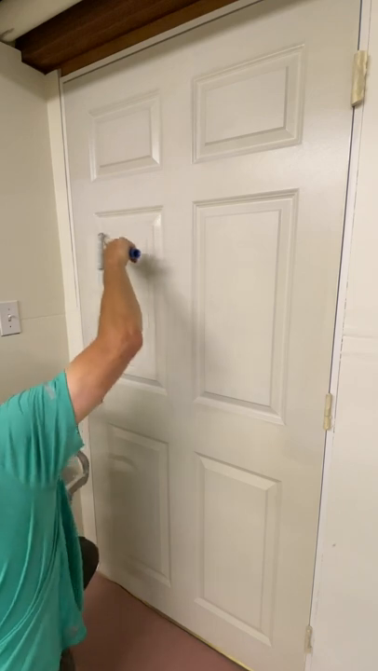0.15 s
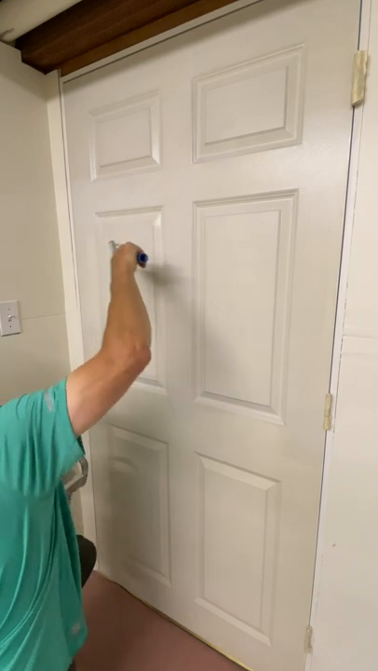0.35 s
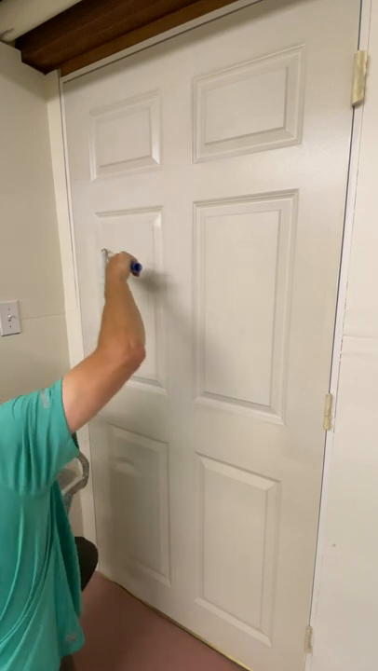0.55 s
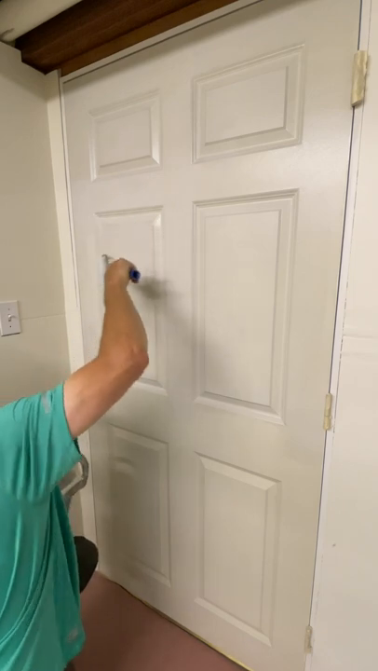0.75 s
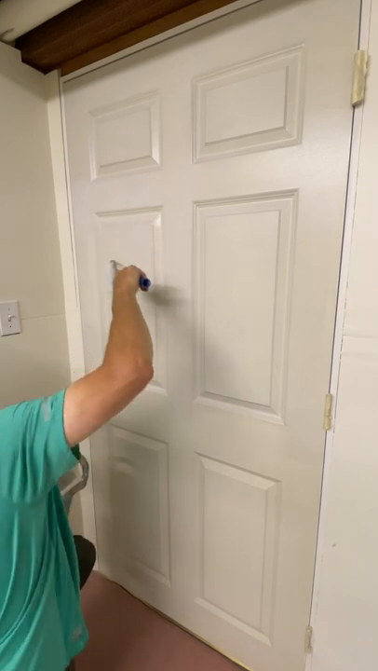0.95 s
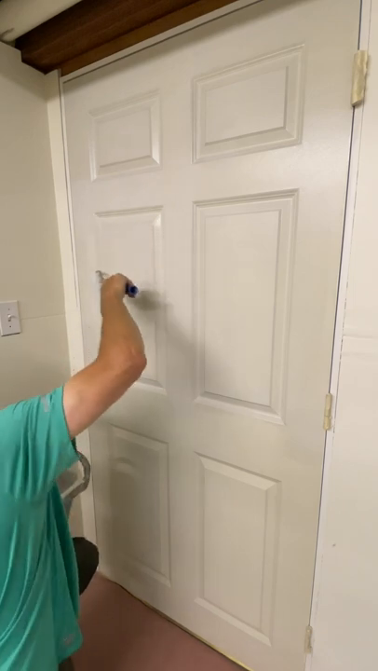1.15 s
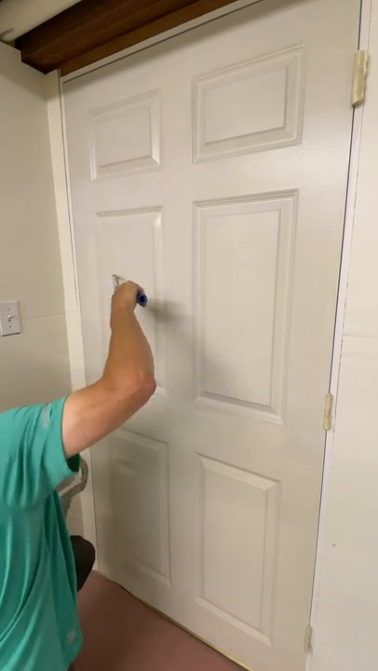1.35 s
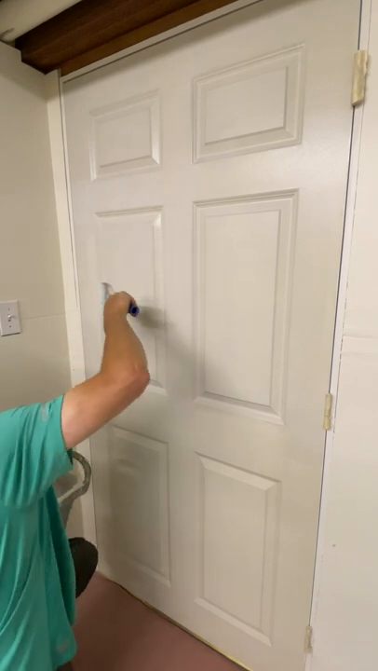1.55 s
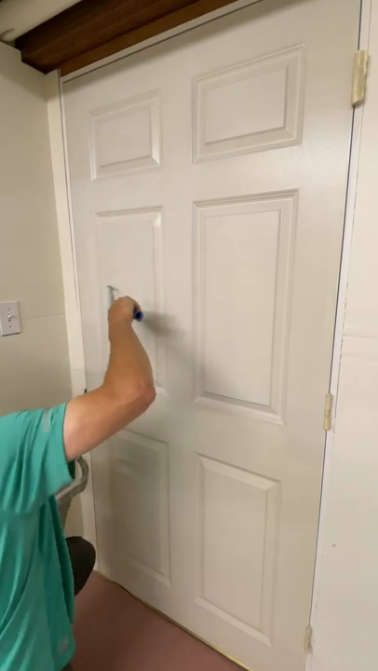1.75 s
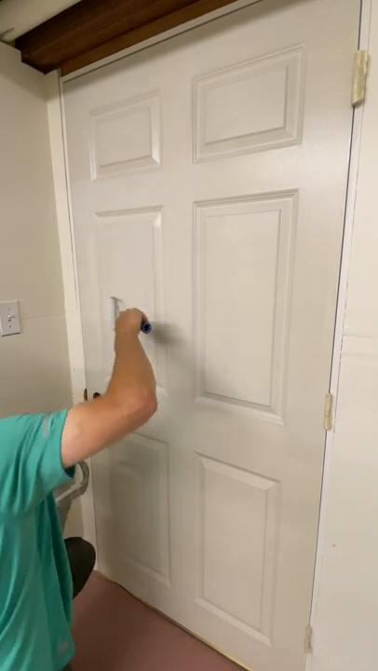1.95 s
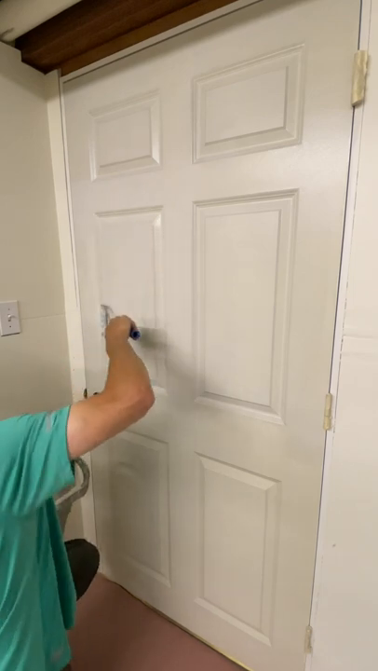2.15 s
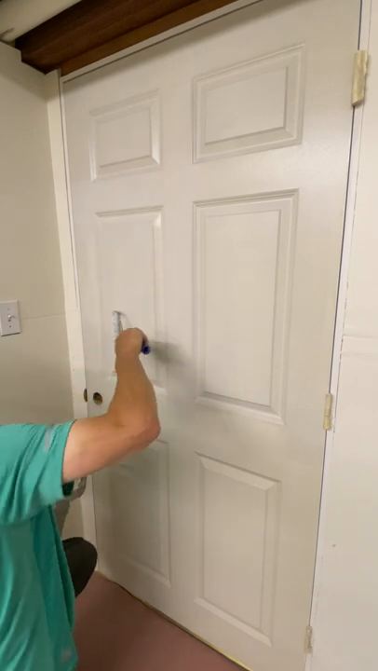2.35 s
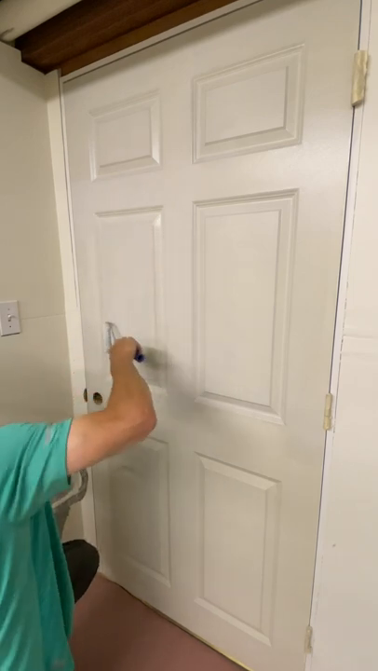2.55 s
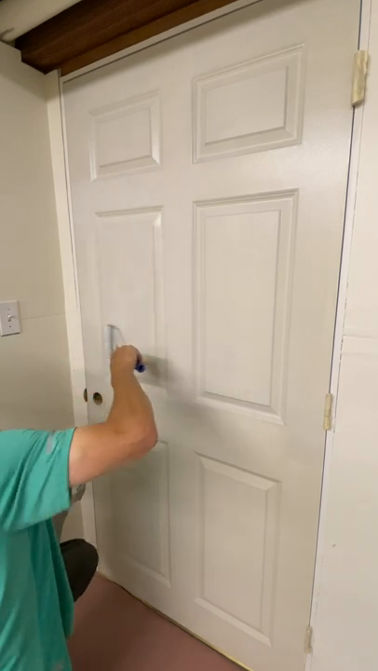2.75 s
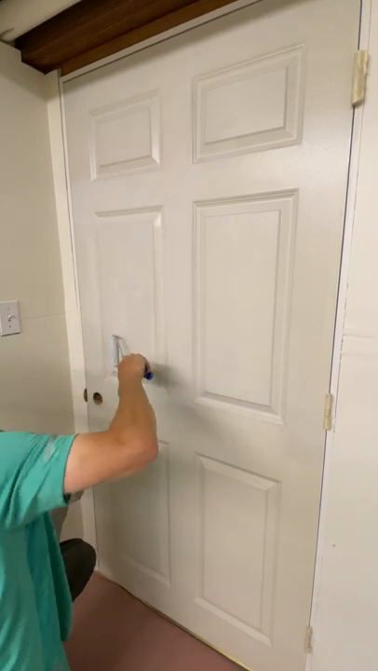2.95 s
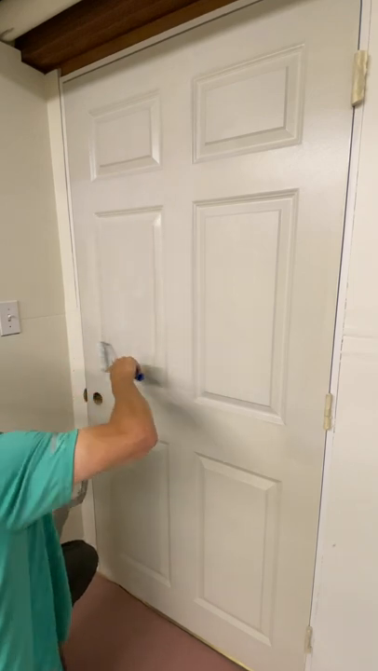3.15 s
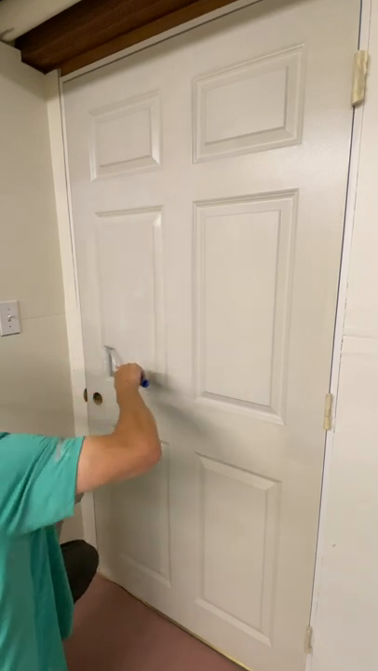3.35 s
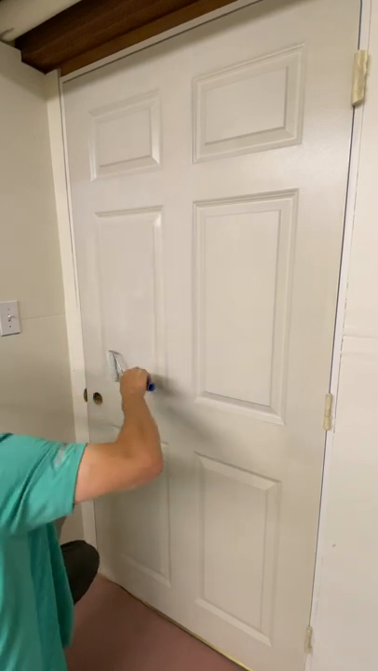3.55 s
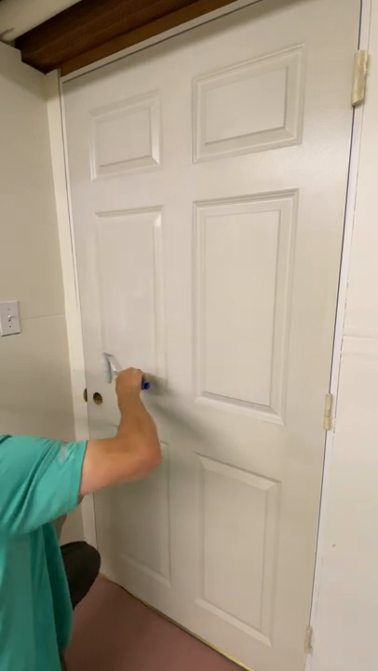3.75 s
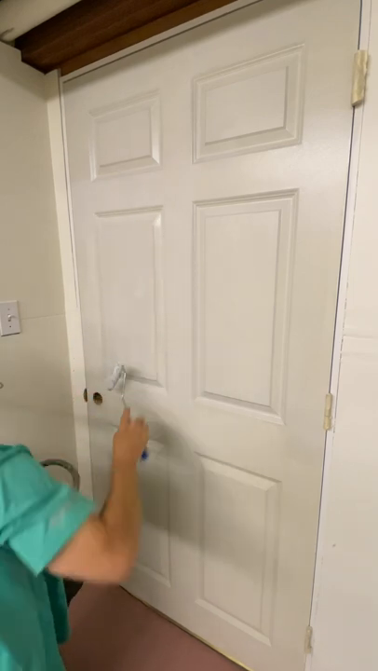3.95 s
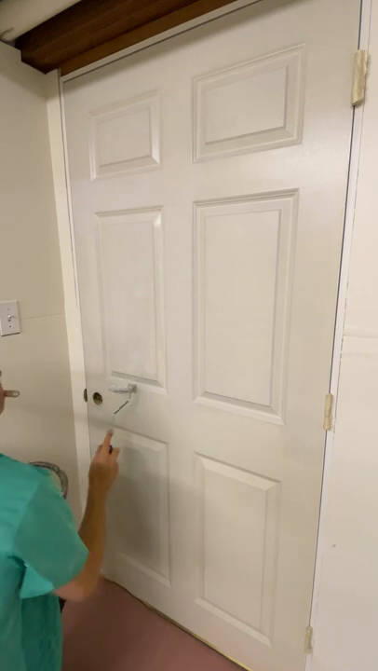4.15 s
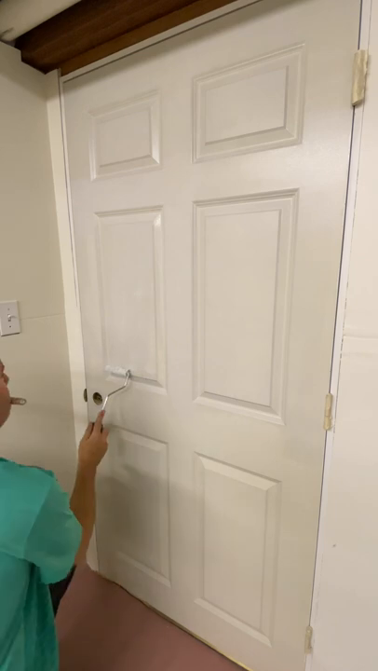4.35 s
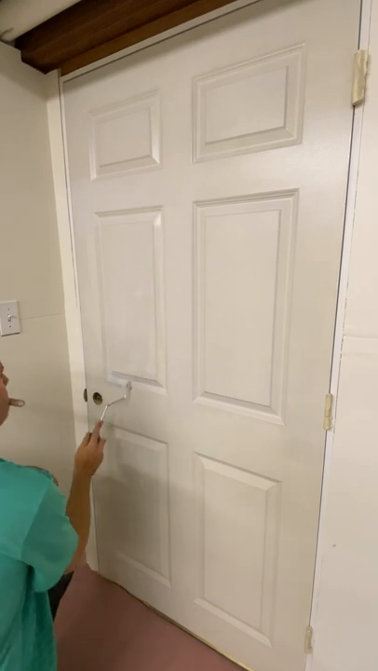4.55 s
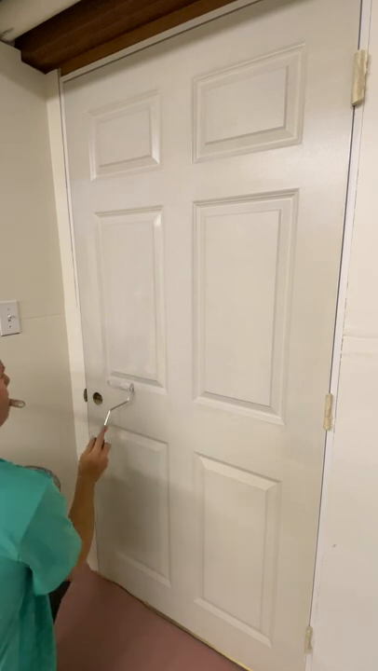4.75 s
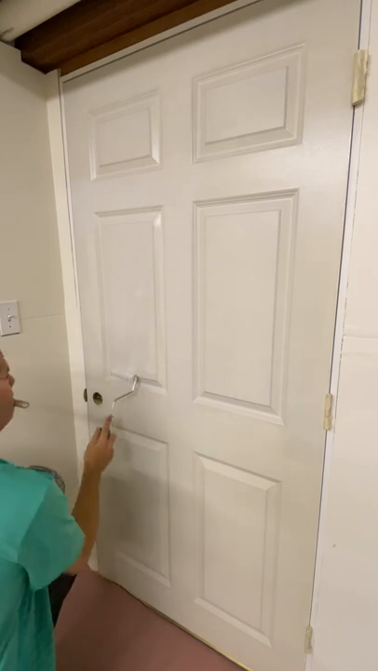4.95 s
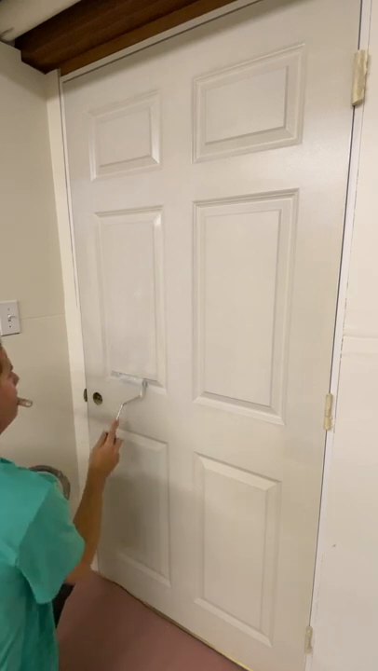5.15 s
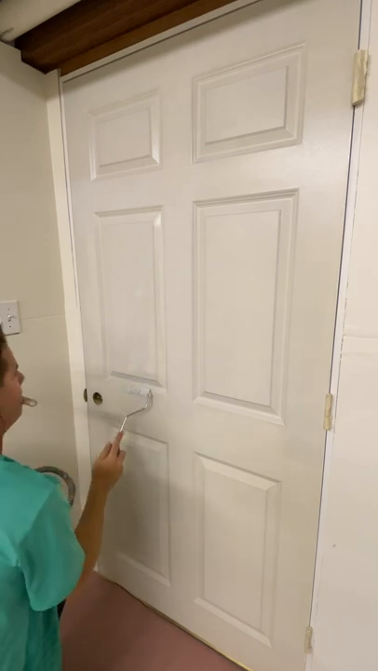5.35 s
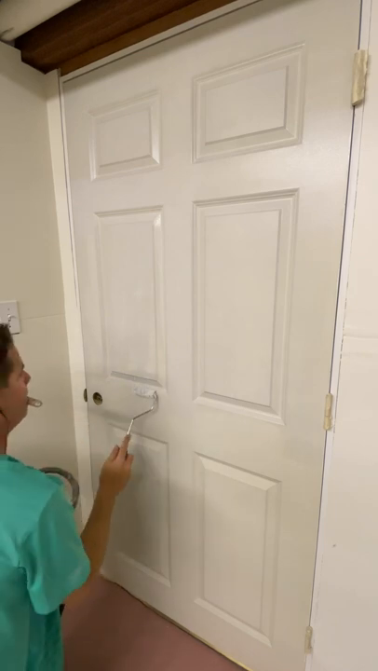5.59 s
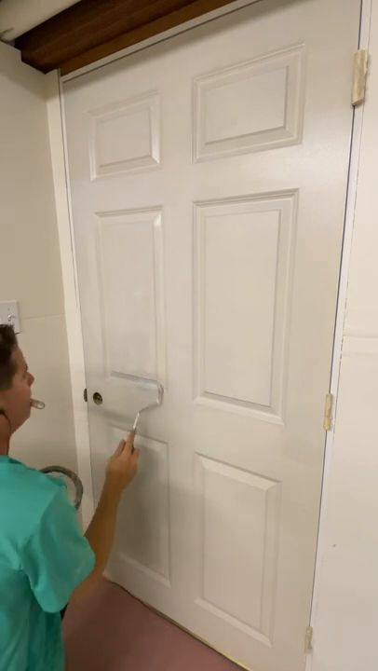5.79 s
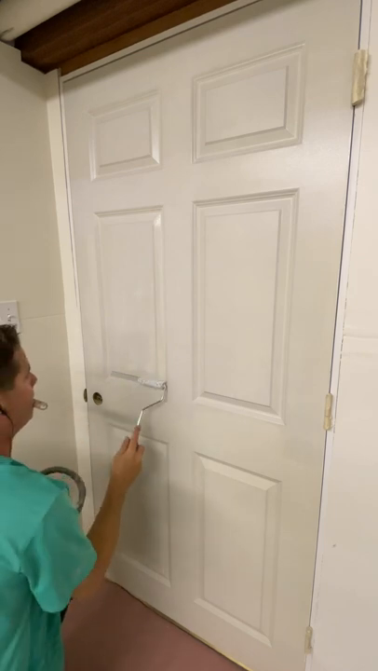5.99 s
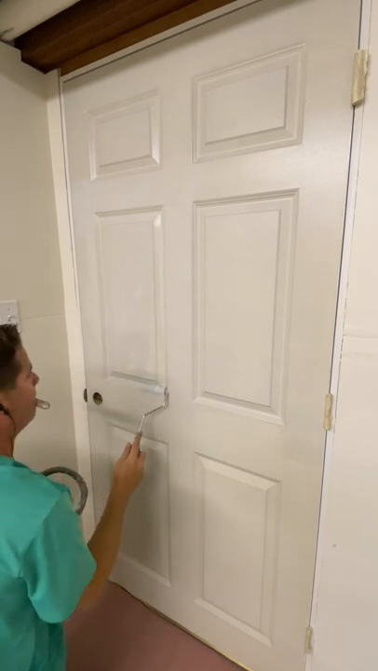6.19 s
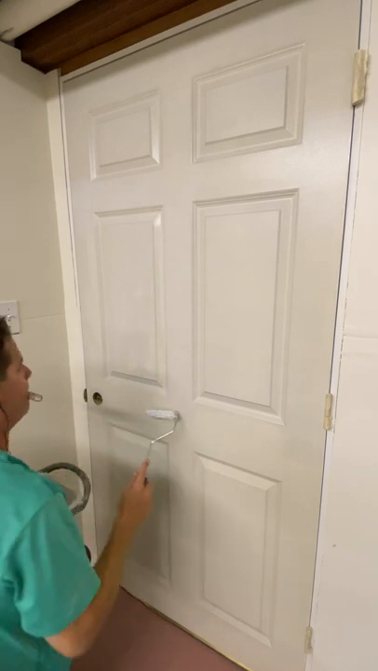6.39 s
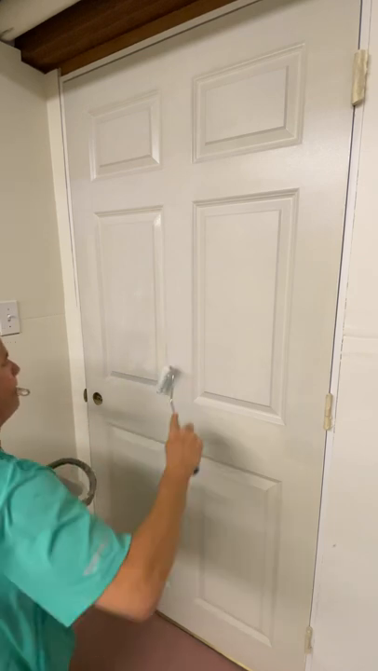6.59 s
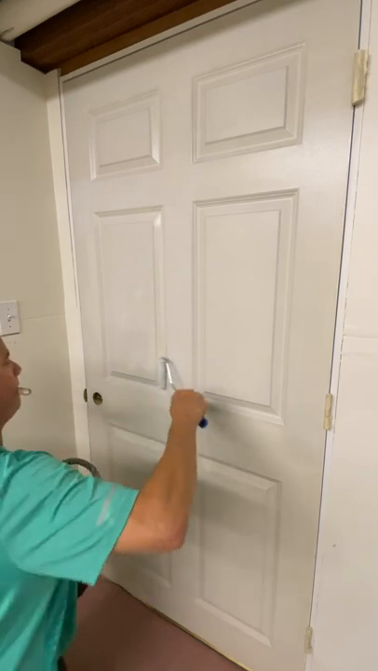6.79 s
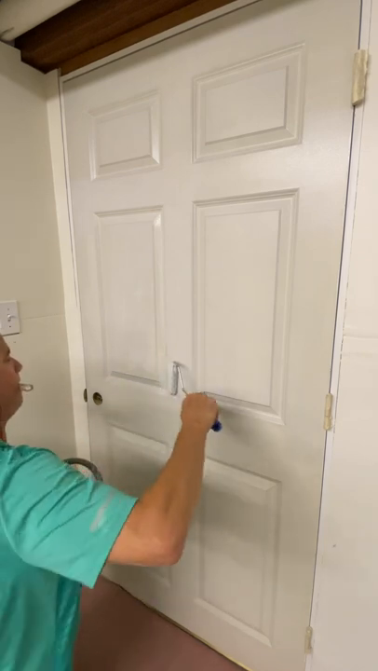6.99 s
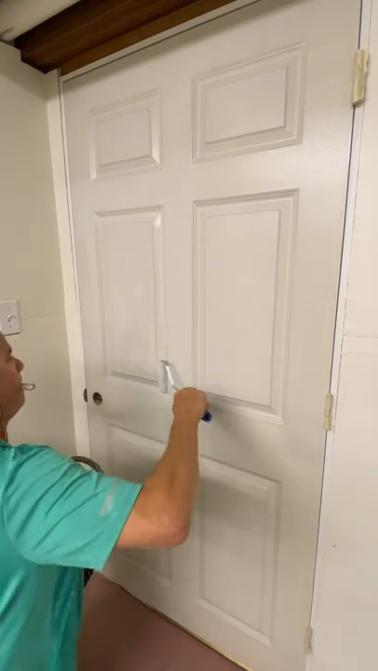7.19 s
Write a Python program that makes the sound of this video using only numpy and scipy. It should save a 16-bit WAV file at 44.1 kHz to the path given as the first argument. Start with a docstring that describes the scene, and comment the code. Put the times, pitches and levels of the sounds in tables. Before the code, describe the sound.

A small wet paint roller rubs quickly over a hollow panel door, fizzing stickily, with low rumbles, wooden knocks and small wire pings.

```python
"""A small foam roller runs in quick strokes over a wet, hollow panel door in a small room, heard in stereo.
From the first moment wet paint fizzes off the nap, the door rumbles under the pressure, the roller knocks
over the mouldings and its wire frame pings. From two seconds in, a leaf mode hums under some pushes.
Past four seconds the plastic end of the sleeve clacks on the door and bounces; past six, three hollow raps
come from a panel corner. Noise bands make fizz, rumble and knocks; decaying sines make what rings."""
import sys
import numpy as np
from scipy import signal
from scipy.fft import rfft, irfft, next_fast_len
from scipy.io import wavfile
from scipy.ndimage import uniform_filter1d, map_coordinates

SR = 44100
rng = np.random.default_rng(int(sys.argv[2]) if len(sys.argv) > 2 else 0)


def to_wav(sig):
    """Store sig (one row per channel, or 1-D mono) as 16-bit WAV at the path in sys.argv[1].

    Samples outside -1..1 are clipped; the rate is SR.
    """
    pcm = np.clip(np.atleast_2d(sig), -1, 1) * 32767
    pcm = np.round(pcm).astype(np.int16)
    wavfile.write(sys.argv[1], SR, pcm.T)  # frames by channels


N = 318843

# Modes of the whole door leaf. Each row: frequency in Hz, relative level in dB, t60 in seconds.
LEAF_MODES = [(114.3, -0.5, 0.34), (147.2, -6, 0.35), (160.45, 0, 0.25), (212.3, -4.5, 0.22),
              (243.6, -8, 0.14)]
# Modes of the door's thin skin. Each row: frequency in Hz, relative level in dB, t60 in seconds.
SKIN_MODES = [(283.5, -5, 0.18), (342, -6, 0.2), (374, 0.5, 0.2), (455.5, 1, 0.13), (479.6, 3.5, 0.073),
              (521, 3, 0.079), (610.3, -9.5, 0.12), (773, -10.5, 0.078), (902, -20, 0.094),
              (1030, -8, 0.11), (1130, -24, .07), (1370, -14, .06)]


def amp(db):
    """Decibels to gain."""
    return 10 ** (np.asarray(db) / 20)


def unit(x):
    """x scaled to an rms of 1."""
    return x / np.sqrt(np.mean(x ** 2) + 1e-20)


def along(points, hz):
    """Reads a curve of (Hz, value) points on a log frequency axis."""
    f, v = np.transpose(points)
    return np.interp(np.log(hz + 1), np.log(f + 1), v)


def wobble(rate):
    """A smooth random curve through rate knots a second."""
    knots = rng.standard_normal(int(N * rate / SR) + 4)
    return map_coordinates(knots, [np.arange(N) * rate / SR])


def filtered(x, response):
    """x times a complex response of frequency."""
    m = next_fast_len(N + SR // 2)
    return irfft(rfft(x, m) * response(np.fft.rfftfreq(m, 1 / SR)), m)[..., :N]


def coloured(x, curve):
    """x with its spectrum shaped by a curve of (Hz, dB) points."""
    return filtered(x, lambda hz: amp(along(curve, hz)))


def noise(spectrum, spiky_db=0):
    """Coloured noise of rms 1; spiky_db spreads the sizes of its grains."""
    grains = rng.standard_normal(N) * amp(spiky_db * rng.exponential(size=N))
    return unit(coloured(grains, spectrum))


def patchy(spectrum, spiky_db, patchy_db):
    """Grainy noise whose colour drifts at random over time and frequency."""
    z = signal.stft(noise(spectrum, spiky_db), nperseg=256)[2]
    field = uniform_filter1d(rng.standard_normal(z.shape), size=4, axis=0)
    field = uniform_filter1d(field, size=8, axis=1)
    return unit(signal.istft(z * amp(patchy_db * unit(field)), nperseg=256)[1][:N])


def sparse(rate, spread_db):
    """Clicks at random moments, rate a second on average, of random size and sign."""
    when, size, sign = rng.random((3, N))
    return (when < rate / SR) * amp(-spread_db * np.log(size + 0.0035)) * np.sign(sign - .5)


def bursts(times, levels_db, t60, rise):
    """An envelope that rises quickly at each time and dies away; overlaps add in power."""
    env, t = np.zeros(N + SR), np.arange(SR // 2) / SR
    for s, db in zip(times, levels_db):
        env[round(s * SR):][:len(t)] += amp(2 * (db - 60 * t / t60)) * (1 - np.exp(-t / rise)) ** 2
    return np.sqrt(env[:N])


def spells(start, length, level_db, fall_db, rise, t60):
    """An envelope that rises at each start, sinks steadily for its length and then dies away."""
    env, t = np.zeros(N + SR), np.arange(SR * 3 // 4) / SR
    holds, rises = np.maximum(length, .01), rise + 0 * start
    for s, hold, db, fall, swell in zip(start, holds, level_db, fall_db, rises):
        shape_db = db - fall * np.minimum(t / hold, 1) - 60 * np.maximum(t - hold, 0) / t60
        env[round(s * SR):][:len(t)] += amp(2 * shape_db) * (1 - np.exp(-t / swell)) ** 2
    return np.sqrt(env[:N])


def ringing(times, levels_db, modes, scatter_db, rise=0.00084):
    """Every blow rings the same decaying modes at new random strengths and signs."""
    out, t = np.zeros(N + SR), np.arange(SR // 2) / SR
    hz, mode_db, t60 = np.transpose(modes)[:, :, None]
    shapes = amp(mode_db - 60 * t / t60) * np.sin(2 * np.pi * hz * t) * (1 - np.exp(-t / rise))
    chance = rng.standard_normal((len(times), 2, len(modes)))
    for s, db, (size, sign) in zip(times, levels_db, chance):
        out[round(s * SR):][:len(t)] += (amp(db + scatter_db * size) * np.sign(sign)) @ shapes
    return out[:N]


def still_air():
    """The still room: steady noise, partly common to both ports and partly separate in each."""
    # Each row: frequency in Hz, relative level in dB per Hz.
    air = [(15, -48.5), (25, 2), (79, 3), (130, -10), (363, -33), (515, -35), (691, -36), (927, -32),
           (2000, -31), (15000, -48.5)]
    common, separate = noise(air), np.array([noise(air), noise(air)])
    return amp(-60.5) * (0.28 * common + 0.5 * separate)


def room(x):
    """The walls answer with noise tails whose frequencies die at their own speeds and differ by port."""
    # Each row: frequency in Hz, t60 in seconds.
    wall_decay = [(100, 0.8), (500, 0.14), (2000, 0.19), (8000, 0.025)]
    # Room against direct sound. Each row: frequency in Hz, gain in dB.
    wet_curve = [(40, -39), (120, -25), (300, -12.5), (600, 0), (1800, -7.5), (3000, -8), (6000, -9.5),
                 (15000, -79)]
    step, out = SR // 3, np.zeros((2, N + 2 * SR))
    for start in range(0, N, step):  # a fresh tail for each third of a second
        hz, t, z = signal.stft(rng.standard_normal((2, SR // 2)), SR, nperseg=256)
        fall = amp(-60 * t / along(wall_decay, hz)[:, None])
        fall = fall / np.linalg.norm(fall, axis=1, keepdims=True)
        tail = signal.istft(z * fall, SR, nperseg=256)[1]
        tail = tail / np.linalg.norm(tail[0])
        answer = signal.fftconvolve(x[None, start:start + step], tail, axes=1)
        out[:, start + SR // 150:][:, :answer.shape[1]] += answer
    return coloured(out[:, :N], wet_curve)


def frame():
    """A jolt rings the loose wire frame; the axle squeaks roughly on its lowest mode, then lets go."""
    # Each row: start in seconds, nominal level in dB, pitch in Hz, squeak length in seconds.
    jolts = [(0.364, -49, 1070, .006), (0.519, -45, 1035, 0.018), (0.854, -62, 1030, .006),
             (0.946, -46, 1065, .008), (1.075, -58, 1025, .02), (1.21, -47, 1007, 0.0098),
             (1.314, -49, 1010, .008), (1.5516, -59, 1080, .006), (1.905, -45, 1050, 0.0086),
             (2.1131, -49, 975, .008), (2.2467, -49, 1000, 0.0095), (2.397, -47.5, 1038, 0.011),
             (2.454, -46.5, 1034, 0.011), (2.57, -48, 1050, .008), (2.79, -49, 1080, .006),
             (2.8582, -50, 1050, .006), (2.899, -38, 1026, 0.013), (3.091, -39, 1050, .008),
             (3.207, -43, 1060, 0.007), (3.378, -47, 1019, 0.017), (3.813, -35, 1031, 0.017),
             (4.085, -54, 1042, .005), (4.717, -44, 1034, 0.0095)]
    # Row 0 gives the squeak its decay. Each row: multiple of the pitch, relative level in dB, t60 in seconds.
    wire_modes = [(1, 0, .11), (1.35, -9, .03), (1.87, -13, .03), (2.25, -12, .035)]
    squeak_in_s, squeak_drop_db, waver_hz, rough_db = .004, 8, 15, 2.8
    out, t = np.zeros(N + SR), np.arange(SR // 4) / SR
    waver = np.pad(np.cumsum(waver_hz * wobble(80)) / SR, (0, SR), "edge")  # in turns
    rough = np.pad(rough_db * wobble(90), (0, SR), "edge")
    for s, db, hz, length in jolts:
        at = slice(round(s * SR), round(s * SR) + len(t))
        after = np.maximum(t - length, 0)
        shape_db = -60 * after / wire_modes[0][2] - squeak_drop_db * (1 - np.exp(-after / .003))
        level = amp(db - 8 + shape_db + rough[at]) * (1 - np.exp(-t / squeak_in_s))
        out[at] += level * np.sin(2 * np.pi * (hz * t + waver[at]))
    upper = [ringing([s], [db], np.multiply(wire_modes[1:], [hz, 1, 1]), scatter_db=2.5, rise=.003)
             for s, db, hz, length in jolts]
    return out[:N] + np.sum(upper, axis=0)


def raps():
    """A hard edge raps inside a panel corner: a very short crack whose quick repeats sound hollow."""
    # Each row: start in seconds, level in dB before colouring.
    rap_times = [(6.0446, -27.5), (6.193, -30), (6.27, -44)]
    # Each row: frequency in Hz, gain in dB.
    rap_colour = [(300, -20), (550, -3), (900, 1), (1500, 0), (2000, 1), (3000, -5), (4000, -11),
                  (6000, -35)]
    flutter_s, flutter_step_db = .00208, 4
    out, t = np.zeros(N + SR), np.arange(SR // 200) / SR
    for (s, db), crack in zip(rap_times, rng.standard_normal((len(rap_times), len(t)))):
        crack = unit(crack * amp(-60 * t / .004))
        for k in range(5):  # the second crack is the loudest
            level = amp(db - flutter_step_db * abs(k - 1))
            out[round((s + k * flutter_s) * SR):][:len(t)] += level * crack
    return coloured(out[:N], rap_colour)


def clack():
    """The sleeve's plastic end lands hard on the door and bounces, ringing its own modes."""
    # Each row: start in seconds, nominal level in dB.
    landings = [(4.1695, -30.5), (4.183, -37.5)]
    # Each row: frequency in Hz, relative level in dB, t60 in seconds.
    cap_modes = [(1124, -13, 0.062), (1285, -12, 0.056), (1630, -2, .03), (1670, -6, 0.025),
                 (1790, 1, 0.034), (1870, -6, .02), (2034, 3.5, 0.022), (2120, 0.5, .025), (2240, -3, .03),
                 (2400, -17, .02), (2574, -2.5, 0.04), (5450, -17, .09)]
    return ringing(*np.transpose(landings), cap_modes, scatter_db=1.5)


def hum():
    """One leaf mode hums, slightly unsteady, while the nap drags over the foot of the panel."""
    # Each row: start in seconds, length in seconds, level in dB, fall over the length in dB.
    drags = [(2.152, 0.049, -52.5, -1), (4.45, 0.042, -44, 8), (4.603, 0.073, -56, 6),
             (4.742, 0.064, -49, 7.5), (5.018, 0.03, -50, -2), (5.16, 0.09, -48.5, 7.5),
             (5.28, 0.079, -49, 6), (5.432, 0.063, -56, 3), (5.538, 0.062, -49.5, 1),
             (5.782, 0.069, -52.5, 0), (6.908, 0.049, -58, 6)]
    hum_hz, waver_hz, in_s, t60_s = 241, 5.43, 0.013, 0.18
    turns = np.cumsum(hum_hz + waver_hz * wobble(25)) / SR
    tone = unit(amp(1.9 * wobble(30)) * np.sin(2 * np.pi * turns))
    return spells(*np.transpose(drags), in_s, t60_s) * tone


def lumps():
    """Unevenness of the nap gives small jolts that ring the resonances of leaf and skin."""
    # How strongly the jolts stir the modes. Each row: frequency in Hz, gain in dB.
    jogged = [(100, -7), (170, 0.5), (245, 4), (330, -6), (500, -10), (650, -13), (1300, -35)]
    # each mode's centre in Hz, bandwidth in Hz from its t60, and level in dB
    resonances = [(hz, np.log(1000) / np.pi / t60, db + along(jogged, hz))
                  for hz, db, t60 in LEAF_MODES + SKIN_MODES]

    def modes(f):
        """Resonant bands summed with alternating signs."""
        return sum((-1) ** k * amp(db) * 1j * f * w / (c * c - f * f + 1j * f * w)
                   for k, (c, w, db) in enumerate(resonances))

    return unit(filtered(sparse(70, spread_db=4), modes))


def rolling():
    """The hand leans on the door: its lowest modes shudder with each push and the thin panel drones."""
    # Each row: start in seconds, length in seconds, rumble level in dB, its fall over the push in dB,
    # panel drone level in dB, its fall in dB.
    pushes = [(0, 0.065, -46, 13, -61.5, -1.5), (0.079, 0.16, -43, -4, -59.5, 3.5),
              (0.367, 0.049, -55, -3, -62.5, -1), (0.447, 0.2, -33, 13.5, -43.5, 29.5),
              (0.712, 0.1, -55.5, -8, -62.5, -4), (0.823, 0.11, -37, 3, -50, 8),
              (1.035, 0.076, -45, 19, -66, -6), (1.154, 0.16, -35, 5, -53.5, 2.5),
              (1.399, 0.09, -46.5, 8, -71, -15), (1.488, 0.042, -46.5, -7, -52, 6.5),
              (1.614, 0.087, -49, 6, -61, 9), (1.708, 0.08, -54.5, -1, -72, -11.5),
              (1.833, 0.08, -45, -0.5, -55, 5.5), (1.963, 0.16, -51, 5.5, -59, 21),
              (2.146, 0.16, -49, -5.5, -50, 13.5), (2.398, 0.094, -51, 5, -63.5, 18),
              (2.541, 0.081, -34.5, 6, -49, 11), (2.737, 0.13, -54.5, -9, -61.5, -3.5),
              (2.886, 0.14, -37, 13.5, -44.5, 36), (3.076, 0.051, -55.5, -8, -59, -1),
              (3.185, 0.12, -41.5, 3.5, -41.5, 30), (3.393, 0.21, -49, 9, -62, 13),
              (3.679, 0.052, -47, 7.5, -75, -12), (3.772, 0.12, -44.5, 5.5, -55.5, 20),
              (4.214, 0.13, -38, 3, -44, 12), (4.382, 0.054, -36.5, 8, -45.5, 10),
              (4.472, 0.084, -34.5, 5, -37.5, 12), (4.603, 0.1, -49, -8, -53, 13),
              (4.722, 0.066, -42.5, -1.5, -50, 4.5), (4.882, 0.087, -41.5, 0, -61, 0),
              (5.004, 0.15, -33, 8.5, -48, 21), (5.158, 0.094, -46.5, -6, -59, -7.5),
              (5.302, 0.11, -37.5, 3.5, -58, 12), (5.436, 0.13, -40.5, 6, -58, -3),
              (5.536, 0.099, -32, 7.5, -52, -1), (5.701, 0.02, -38, -0.5, -62, 2),
              (5.8, 0.12, -38.5, 7, -52, 21), (5.937, 0.047, -52.5, -9, -74, -3),
              (6.058, 0.12, -46, -3.5, -39.5, 30), (6.181, 0.093, -39, 7, -47.5, -2),
              (6.322, 0.29, -49.5, 15.5, -71.5, 13), (6.683, 0.061, -50.5, -6, -77.5, -2),
              (6.794, 0.078, -42, 8.5, -72.5, -13), (6.892, 0.17, -34.5, 12.5, -48.5, 27),
              (7.088, 0.055, -44.5, 6, -64, -6), (7.181, 0.07, -46.5, -8.5, -61, -7)]
    # Each row: frequency in Hz, relative level in dB per Hz.
    rumble_colour = [(20, -29.5), (34, -9), (44, 3.5), (54, 5), (66, 8.5), (78, -4), (105, -1), (130, -12),
                     (160, -10.5), (200, -18.5), (300, -52)]
    # Each row: frequency in Hz, relative level in dB per Hz.
    drone_colour = [(65, -19), (110, -10), (193, -23), (242, 0.5), (314, -8.5), (428, -13), (493, -19),
                    (659, -32), (728, -27), (1040, -29.5), (1200, -54), (1560, -84), (2640, -120)]
    rumble_in_s, rumble_t60_s = 0.011, 0.46
    drone_in_s, drone_t60_s = 0.004, 0.21  # the thin panel answers sooner
    s, length, rumble_db, rumble_fall, drone_db, drone_fall = np.transpose(pushes)
    shudder = noise(rumble_colour)
    power = np.abs(uniform_filter1d(shudder ** 2, size=SR // 20))
    shudder = unit(shudder / np.sqrt(power + 0.68))  # evens out the swells
    rumble = spells(s, length, rumble_db, rumble_fall, rumble_in_s, rumble_t60_s) * shudder
    drone = amp(-1.5 + 3.0 * wobble(30)) * noise(drone_colour) + amp(-5.5) * lumps()
    return rumble + spells(s, length, drone_db, drone_fall, drone_in_s, drone_t60_s) * drone


def bumps():
    """Mouldings give a knock that dulls as it dies, a dry snap, and the ringing of wood, leaf and skin."""
    # Each row: start in seconds, nominal knock level in dB, thud, skin and snap levels in dB
    # relative to the knock, knock centre in Hz.
    hits = [(.088, -53, 15, 2.5, 0, 990), (0.143, -49.5, 4.5, -7, -6, 820),
            (.215, -51.5, -10, -21, -9, 840), (0.274, -56, -19, -16, -26, 923),
            (0.36, -51.5, -11, -7.5, -17, 825), (.446, -42.5, 5, 2.5, -8.5, 590),
            (.512, -45, 3.5, 0, -14, 980), (.797, -39, -0.5, -8.5, -20, 845),
            (.853, -42, 2.5, -12, -27, 1000), (.95, -49, -4, -7, -26, 2110),
            (1.139, -37, -3, -6.5, -9.5, 1100), (1.203, -45, 5, -5.5, -24, 1050),
            (1.313, -53.5, 0.5, -20, -4, 626), (1.487, -37.5, -8, -3, -4.5, 930),
            (1.548, -43.5, -5, -7, -14, 1060), (1.58, -43, -9.5, -9, -8, 950),
            (1.65, -53, -27, -12, -26, 1020), (1.909, -41, -34, -21, -19, 1060),
            (2.113, -50.5, -4, -9, -19, 1010), (2.15, -34, -10, -22, -2.5, 950),
            (2.208, -39.5, -7, -34, -8, 1090), (2.247, -44, -3.5, -31, -17, 1020),
            (2.395, -49.5, -19, -18, -17, 960), (2.453, -56, -18, -38, -2, 1060),
            (2.521, -46, -23, -24, -9, 960), (2.569, -45.5, -3, -27, -20, 960),
            (2.802, -37, -31, -33, 1, 1040), (2.858, -40.5, -14, -22, -24, 1010),
            (3.028, -57, -23, -15, -17, 1030), (3.086, -36.5, -9, -23, 0.5, 1030),
            (3.162, -51.5, 10.5, -2.5, -4, 1010), (3.382, -58, -24, -31, -1, 1080),
            (3.457, -58.5, 4, -17, 7.5, 2250), (3.678, -55, -11, -18, -14, 2200),
            (3.779, -62, -4, -22, 6, 1910), (3.816, -50.5, -31, -24, -24, 1080),
            (4.038, -63.5, -15, -35, -18, 2320), (4.077, -57, -18, -23, -3.5, 1050),
            (4.17, -32, -40, -11.5, -18.5, 1750), (4.384, -54.5, -6, 4, -5, 716),
            (4.457, -43, 0.5, -6.5, -10, 960), (4.581, -60, 3, -4, -2, 2210),
            (4.683, -64.5, 4, 11.5, -16, 918), (4.717, -41.5, -24, -30, -12, 1060),
            (4.877, -62, 14, -23, 8.5, 2270), (4.971, -60, -3, 7.5, -20, 910),
            (5.007, -37.5, -11.5, -15, -6, 596), (5.153, -52.5, -12, -2, -6, 596),
            (5.239, -48.5, -13, 0, -12, 720), (5.283, -45.5, 2, -13, -7, 600),
            (5.43, -47, 6.5, -10, 1, 940), (5.54, -48, 4.5, -0.5, 4, 765), (5.794, -53.5, 3, -3.5, 2, 580),
            (6.021, -63, 7, 0, 4, 2240), (6.048, -30, -9.5, -7, -10.5, 790),
            (6.195, -29, -0.5, -11.5, -5.5, 830), (6.27, -39, 1.5, -10, -20, 925),
            (6.323, -48, -3, -33, 3.5, 1490), (6.811, -59.5, -15, -14, 5, 2340),
            (6.904, -49.5, 11.5, 2, 0, 644)]
    # Each row: multiple of the knock's centre, relative level in dB.
    knock_colour = [(.3, -27), (.6, -8), (1, 2), (1.5, -6), (2.5, -9), (5, -41.5)]
    # Each row: frequency in Hz, relative level in dB.
    snap_colour = [(1200, -23), (2200, 4), (3000, 9), (4200, -4.5), (5500, -12), (8000, -24), (15000, -67)]
    # The moulding's edge. Each row: frequency in Hz, relative level in dB, t60 in seconds.
    wood_modes = [(2396, 1.5, 0.026), (2930, -14, 0.029), (3176, -5.5, 0.051), (3670, -1, 0.028)]
    knock_t60_s, dull_t60_s, snap_t60_s = 0.052, 0.15, 0.041
    body_in_s = 0.0083  # the door's modes fill in after a blow
    s, db, thud_db, skin_db, snap_db, centre_hz = np.transpose(hits)
    size = SR // 3
    t, hz = np.arange(size) / SR, np.fft.rfftfreq(size, 1 / SR)
    raw, knock = rfft(rng.standard_normal((len(s), 2, size))), np.zeros(N + SR)
    crack = .8 + 1.3 * amp(-60 * t / 0.035)  # the first contact is harder than what follows
    sharp = crack * amp(-3.5 - 60 * t / knock_t60_s) * (1 - np.exp(-t / 0.002))
    soft = amp(-10.0 - 60 * t / dull_t60_s) * (1 - np.exp(-t / 0.014))

    def band(z, centre):
        """Noise coloured around one centre frequency."""
        return unit(irfft(z * amp(along(np.multiply(knock_colour, [centre, 1]), hz)), size))

    for k in range(len(s)):
        bright = band(raw[k][0], centre_hz[k])
        dull = band(raw[k][1], 0.43 * centre_hz[k])
        knock[round(s[k] * SR):][:size] += amp(db[k]) * (bright * sharp + dull * soft)
    snap = bursts(s, db + snap_db, snap_t60_s, rise=0.0024) * noise(snap_colour, spiky_db=2.0)
    wood = ringing(s, db + snap_db - 11.5, wood_modes, scatter_db=2.5)
    thud = ringing(s, db + thud_db, LEAF_MODES, scatter_db=3.5, rise=body_in_s)
    skin = ringing(s, db + skin_db, SKIN_MODES, scatter_db=2.5, rise=body_in_s)
    return knock[:N] + snap + wood + thud + skin


def nap():
    """Paint threads snap behind the nap; part of the spray reaches each port on its own."""
    # The nap rolls between two halts. Each row: start in seconds, length in seconds, fizz level in dB,
    # fall over the stroke in dB, sheen and squelch levels in dB relative to the fizz.
    strokes = [(0, 0.12, -65.5, 14, 4, 1.5), (0.085, 0.058, -59.5, 13, -4.5, -14),
               (0.151, 0.042, -60.5, 1.5, 1, -3.5), (0.217, 0.049, -74.5, -12, 4, -7),
               (0.352, 0.045, -66, -1.5, 4, 3), (0.449, 0.061, -58, 23, -3, -8),
               (0.519, 0.049, -57, 8, -2, -0.5), (0.6, 0.03, -66, 1.5, 4.5, -0.5),
               (0.6874, 0.076, -66.5, 1, 3.5, -4), (0.799, 0.036, -50, 20.5, -5, 8),
               (0.857, 0.12, -58.5, 17, 1, 1), (0.95, 0.12, -67.5, 20, 6.5, -7),
               (1.032, 0.079, -66, 7.5, 3.5, 3), (1.1314, 0.041, -52.5, 21, 0, 4),
               (1.21, 0.12, -59, 11.5, 0.5, 0.5), (1.312, 0.11, -75, -6, 5, 1.5),
               (1.4, 0.084, -66, 11.5, 4, 4), (1.488, 0.056, -58.5, 18, 1, -8),
               (1.549, 0.099, -61, 11.5, 1.5, 3.5), (1.64, 0.068, -66, 14, 3, -2),
               (1.714, 0.056, -66, 5, 3.5, 1), (1.828, 0.02, -55.5, 14.5, -1, 0),
               (1.868, 0.062, -62.5, 5, 4.5, -2), (1.95, 0.039, -64.5, 7.5, 4, 0),
               (2.043, 0.07, -68.5, 1.5, 4.5, -2.5), (2.152, 0.063, -51.5, 21, -4, 1.5),
               (2.205, 0.11, -57, 19, 3, 2), (2.3686, 0.049, -64.5, 12.5, 4.5, -6),
               (2.48, 0.061, -69, 1, 1, 3), (2.537, 0.13, -56, 23.5, 1, -1.5),
               (2.709, 0.11, -66, 1.5, 4, -4), (2.8031, 0.09, -60.5, 14, -18, -5),
               (2.8625, 0.11, -57, 21, 3.5, -0.5), (3.0047, 0.048, -65.5, 7.5, 5.5, -3.5),
               (3.082, 0.27, -63, 18.5, 1.5, -6), (3.181, 0.1, -52, 32.5, 2.5, 1.5),
               (3.307, 0.07, -62.5, 24, 6, -14), (3.3976, 0.043, -59, 17, -3, 2),
               (3.456, 0.082, -60.5, 15.5, 3.5, -8.5), (3.594, 0.049, -68, 24, 9, -24),
               (3.669, 0.073, -63.5, 10, -1, -9), (3.742, 0.016, -52.5, 14, 2.5, -10),
               (3.78, 0.063, -54, 32, -2, -4), (3.962, 0.15, -73.5, 10, -2, -20),
               (4.08, 0.23, -68.5, 31, -8, -2.5), (4.157, 0.011, -57, -3.5, -9, -0.5),
               (4.167, 0.077, -40.5, 26, 2.5, -19), (4.2897, 0.056, -56, 10, -1.5, -0.5),
               (4.384, 0.036, -75, -4.5, 1.5, -1), (4.449, 0.11, -52, 41, -0.5, 1),
               (4.578, 0.12, -57.5, 22.5, 2, -5.5), (4.729, 0.057, -55, 19, 2.5, 0.5),
               (4.83, 0.034, -64.5, 8, 3, -7), (4.88, 0.065, -54, 22, -1, -18),
               (4.9665, 0.02, -56.5, 26, -2, -10), (4.999, 0.14, -57.5, 22, 0.5, -4),
               (5.145, 0.055, -59, 8, 0.5, -5), (5.231, 0.039, -55, 23, -7, -8),
               (5.282, 0.078, -50.5, 34, 0, -13), (5.418, 0.067, -63, 10, 2, -7),
               (5.5075, 0.019, -60, 25, 6, -2), (5.5395, 0.07, -49.5, 31.5, -3, -23),
               (5.6796, 0.091, -57, 22, 2, -28), (5.794, 0.051, -51.5, 18.5, -3, -20),
               (5.89, 0.044, -67, 8.5, 1, -21), (5.9443, 0.06, -57.5, 17, 1, -27),
               (6.018, 0.038, -61.5, -6, -3.5, -6), (6.0473, 0.94, -74, 40, -15, 7),
               (6.1949, 0.11, -67.5, 12.5, -20, 15), (6.2732, 0.015, -65.5, -5, -1, -6),
               (6.326, 0.046, -54, 33, -32, -21), (6.693, 0.07, -69, -6, 3.5, -6),
               (6.807, 0.043, -62.5, 2.5, -1.5, -8), (6.8694, 0.019, -64, -2.5, -1, -1),
               (6.906, 0.11, -57.5, 23, 0, -8), (7.026, 0.12, -60, 18.5, 2, -3),
               (7.168, 0.12, -64, -5, -3.5, -13)]
    # Each row: frequency in Hz, relative level in dB per Hz.
    fizz_colour = [(1500, -11.5), (3000, 0.5), (4000, -3), (5500, 1), (7000, 0), (8000, -47), (9500, -26)]
    # The top of the fizz. Each row: frequency in Hz, relative level in dB per Hz.
    sheen_colour = [(6500, -46), (8000, 0.5), (10000, -2.5), (12000, -7), (14000, -9), (15500, -6.5)]
    # Each row: frequency in Hz, relative level in dB per Hz.
    squelch_colour = [(200, -23), (400, 4.5), (800, -1.5), (1300, 1.5), (2000, 2), (2800, 0.5),
                      (3600, -8.5), (5500, -32)]
    tear_in_s, halt_t60_s = 0.0043, 0.18  # the nap tears free; it falls silent at a halt
    firm_db, gentle = -64, 1.9  # fainter strokes swell more slowly: dB of rise time per dB of level
    s, length, fizz_db, fall_db, sheen_db, squelch_db = np.transpose(strokes)
    rise = tear_in_s * amp(gentle * np.maximum(firm_db - fizz_db, 0))
    fizz, sheen, squelch = [spells(s, length, fizz_db + db, fall_db, rise, halt_t60_s)
                            for db in (0, sheen_db, squelch_db)]
    flutter = amp(1.8 * wobble(45) + 1.2 * wobble(14))

    # single threads crack aloud in the fizz
    pops = amp(-3) * unit(coloured(sparse(500, spread_db=3), fizz_colour))
    fizzing = fizz * (patchy(fizz_colour, spiky_db=1.5, patchy_db=3.5) + pops)
    shining = sheen * patchy(sheen_colour, spiky_db=2.5, patchy_db=3.0)

    # bigger blisters of paint burst in the squelch
    smacks = unit(coloured(sparse(120, spread_db=3), squelch_colour))
    wet = patchy(squelch_colour, spiky_db=2.2, patchy_db=3) + smacks
    near = flutter * (fizzing + shining) + squelch * amp(-3.5 + 2.0 * wobble(35)) * wet

    spray = np.array([fizz * noise(fizz_colour) + amp(-4) * sheen * noise(sheen_colour) for port in "LR"])
    return near, amp(-4.5) * flutter * spray


def ports(x):
    """Direct sound reaches two ports with a phase lead and a level lean that depend on frequency."""
    # Each row: frequency in Hz, phase in radians by which the left port leads.
    lead = [(60, 0), (2000, .1), (2700, .9), (5600, 1.2), (7500, 3.1), (9000, 4), (11000, 6.3),
            (14000, 9.4), (16000, 10.6)]
    # Each row: frequency in Hz, left minus right level in dB.
    lean = [(60, 0), (180, 1), (550, 4), (1650, 3.5), (4970, 0.5), (15000, -1)]
    side = np.array([[.5], [-.5]])
    return filtered(x, lambda hz: amp(side * along(lean, hz)) * np.exp(1j * side * along(lead, hz)))


def scene():
    """Direct sound from the door and roller, spray in each port, the walls' answer and still air."""
    near, spray = nap()
    door = near + rolling() + bumps() + clack() + hum()
    ping = frame() + raps()
    walls = room(door + amp(-8) * ping)  # thin wire and short raps stir the room less than the wide door
    return ports(door + ping) + spray + walls + still_air()


def record(dry):
    """A steep band limit removes everything from 15850 Hz up."""
    return filtered(dry, lambda hz: hz < 15850)


dry = scene()
out = record(dry)
to_wav(out)
```